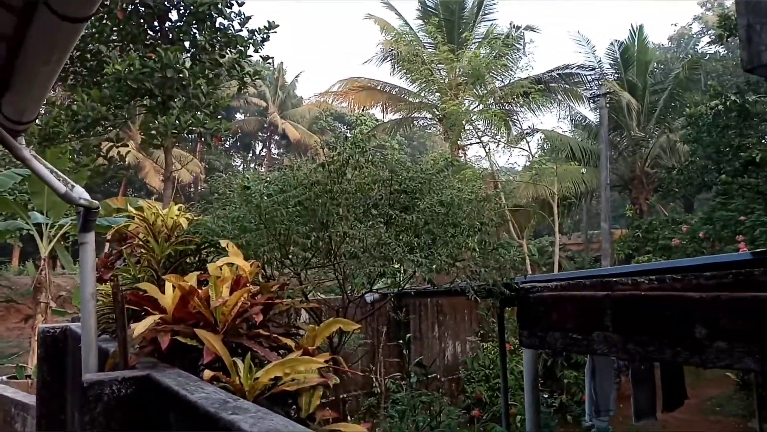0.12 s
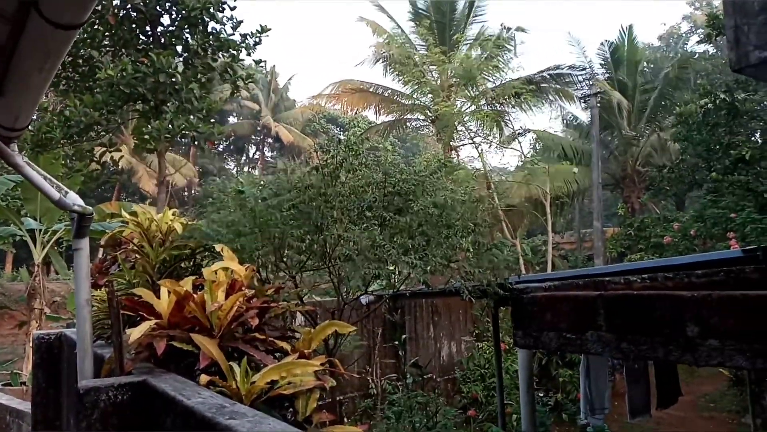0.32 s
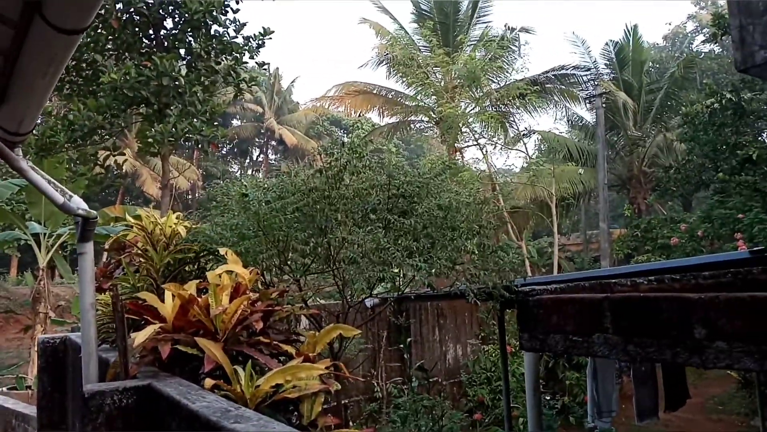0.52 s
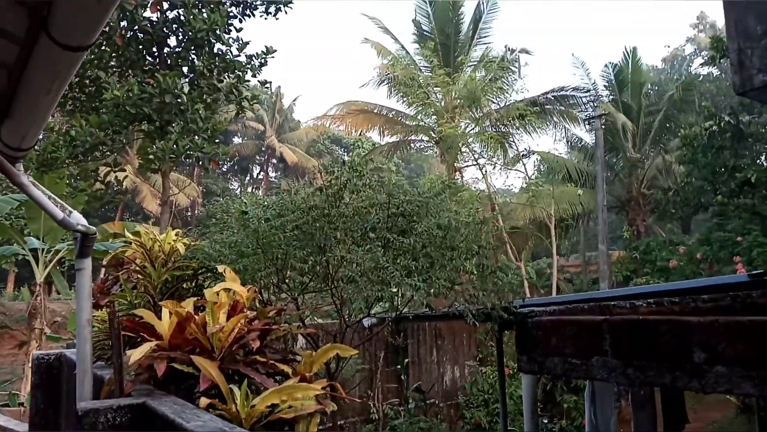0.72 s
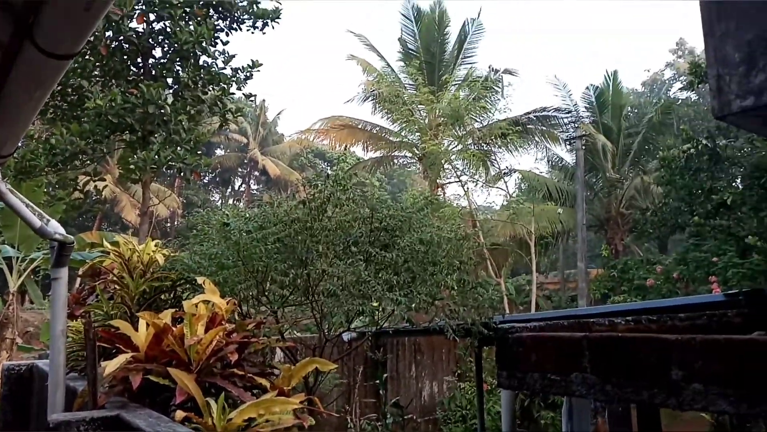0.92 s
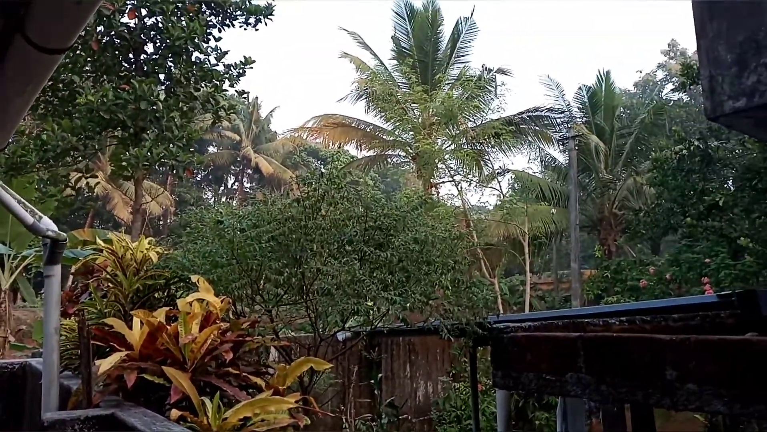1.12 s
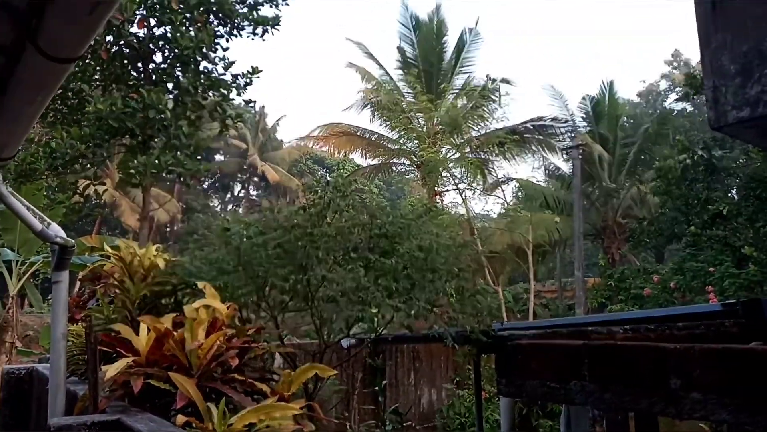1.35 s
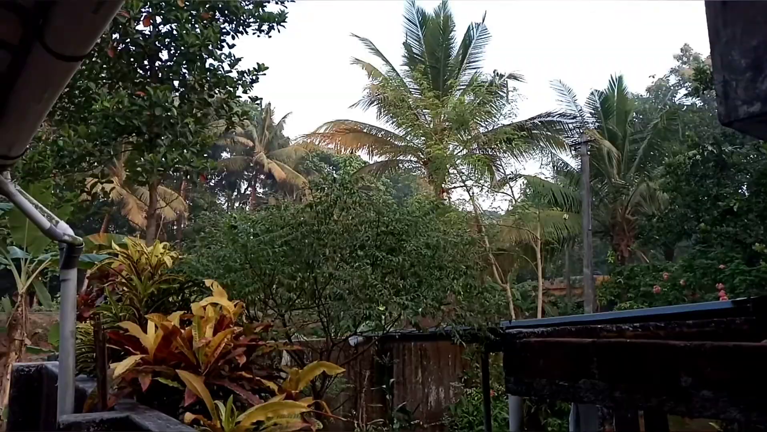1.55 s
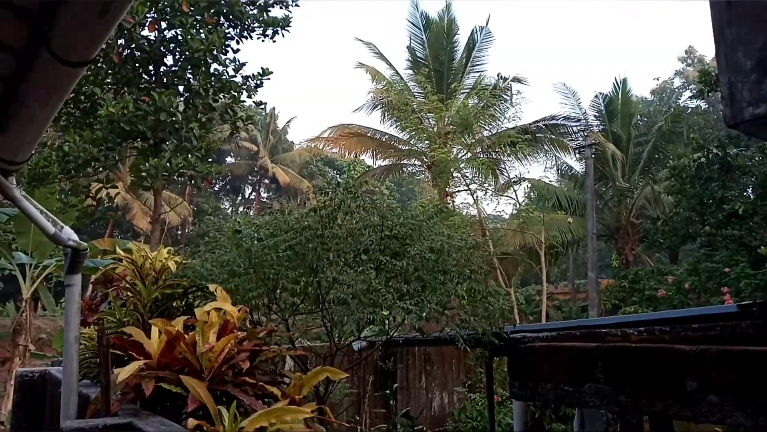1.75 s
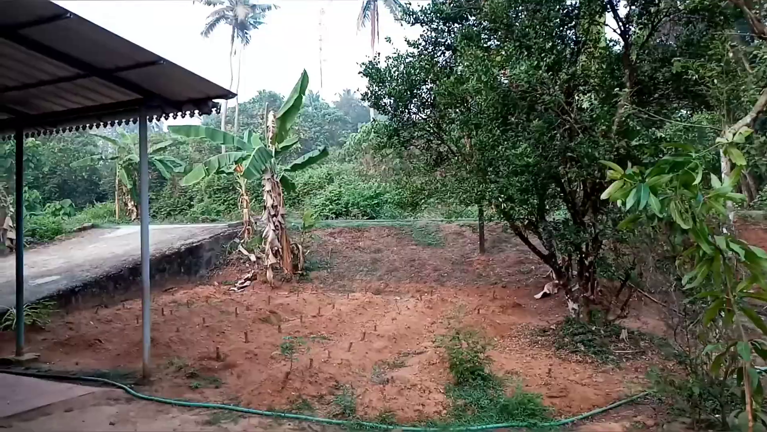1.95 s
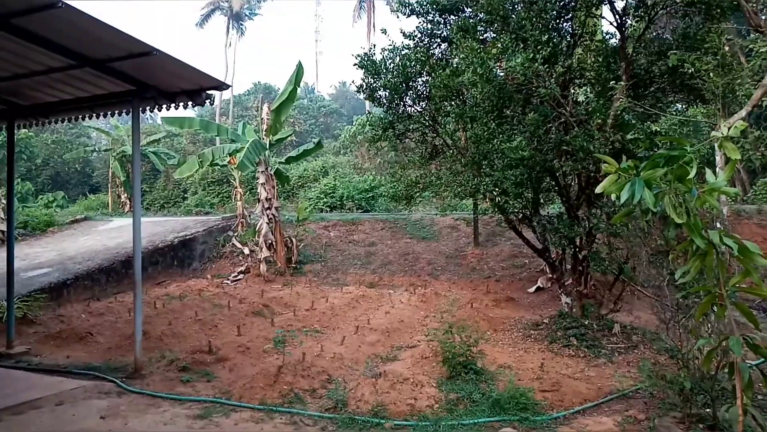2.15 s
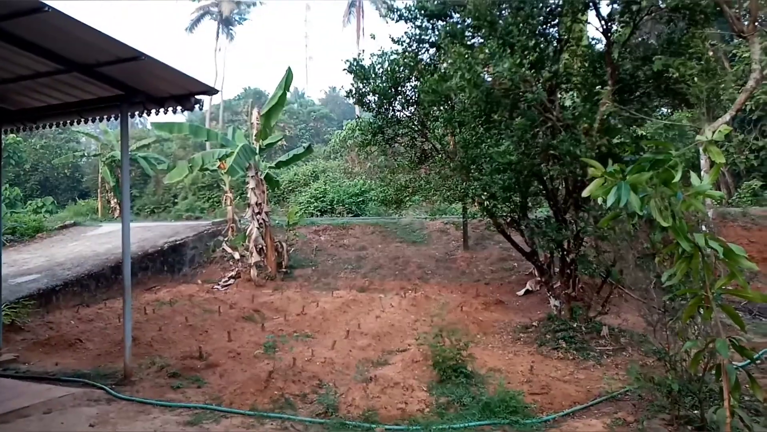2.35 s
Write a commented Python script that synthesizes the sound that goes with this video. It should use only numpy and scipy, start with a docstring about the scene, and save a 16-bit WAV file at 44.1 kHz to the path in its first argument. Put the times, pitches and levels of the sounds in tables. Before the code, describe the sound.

Birdsong echoes through a quiet garden: short fluty whistles from the start, a long arching slur at 0.5 s, buzzy chirps around 0.85 and 1.1 s, thin chips and far whistles between. Insects whine faintly high up. Close by, a dry rasp at 0.3 s and hollow knocks at 0.65, 1.7, 1.8 and 2.44 s. At 1.9 s insects drop abruptly, low rumble rises; a far crow caws at 2.05 s.

```python
"""Dawn in a tropical garden

A songbird's fluty phrase, thin chips, buzzy chirps and a far caw echo among trees. Birds are bending tones.
Insects are narrow bands of noise and one pulsing tone; open air is noise with more bass than treble.
Close by, shaped noise makes a short dry rasp, ticks and soft bumps, and dying tones make a few knocks.
Near the end the background changes at once: fewer insects, more low rumble, and blurred echoes of song."""
import sys
import numpy as np
from scipy import signal
from scipy.fft import rfft, irfft
from scipy.io import wavfile

SR = 44100
rng = np.random.default_rng(int(sys.argv[2]) if len(sys.argv) > 2 else 0)


def unload_audio(sound):
    """Save the sound as a 16-bit wav file, at the path given as the first command line argument."""
    columns = np.transpose(np.atleast_2d(sound))
    # keep every value between -1 and 1, then stretch to whole-number steps
    steps = np.round(np.clip(columns, -1, 1) * 32767)
    wavfile.write(sys.argv[1], SR, steps.astype(np.int16))


N = 108045
T = np.arange(N) / SR  # the time of every sample, in s
HZ = np.maximum(np.arange(N // 2 + 1) * SR / N, 1)  # the frequencies in a spectrum
CHANGE_S = 1.918  # the background changes here
TREES_T60_S, TREBLE_T60_S = 1.09, 0.63  # time for echoes to fall by 60 dB; high voices die sooner


def from_db(db):
    """Turn decibels into a gain."""
    return 10 ** (np.asarray(db) / 20)


def rms_one(x):
    """Scale a sound to a mean power of 1."""
    return x / np.sqrt(np.mean(x ** 2) + 1e-20)


def drift(rate_hz):
    """Random wandering with spread 1; changes faster than rate_hz are weakened."""
    spectrum = rfft(rng.standard_normal(N))
    return rms_one(irfft(spectrum / (1 + (HZ / rate_hz) ** 2), N))


def coloured(x, points):
    """Reshape the spectrum of x along (f/Hz, level/dB) points, at power 1."""
    hz, db = np.transpose(points)
    gain = from_db(np.interp(np.log(HZ), np.log(hz), db))
    return rms_one(irfft(rfft(x) * gain, N))


def band(hz, width_hz):
    """Noise in one bell-shaped band; the width is the standard deviation of its power."""
    bell = np.exp(-((HZ - hz) / (2 * width_hz)) ** 2)
    return rms_one(irfft(rfft(rng.standard_normal(N)) * bell, N))


def level(s, db):
    """Gain along a level curve, silent outside it."""
    return from_db(np.interp(T, s, db)) * (T > s[0]) * (T < s[-1])


def swell(start, length, edge=0.23):
    """Progress 0-1 through a note, and its rounded rise, hold and fall."""
    progress = np.clip((T - start) / length, 0, 1)
    nearest_end = np.minimum(progress, 1 - progress)
    return progress, np.sin(np.pi / 2 * np.clip(nearest_end / edge, 0, 1)) ** 2


def tone(hz):
    """A sine of power 1 that follows a pitch."""
    return np.sqrt(2) * np.sin(2 * np.pi * np.cumsum(hz * np.ones(N)) / SR)


def echo(x, echo_db, t60, build_up_s=0.004):
    """Add dense, dying scatter, as from trunks, leaves and walls."""
    tail = rng.standard_normal(N) * from_db(-60 * T / t60)
    tail = tail * (1 - np.exp(-(T / build_up_s) ** 2))
    tail = tail / np.sqrt(np.sum(tail ** 2))
    return x + from_db(echo_db) * signal.fftconvolve(x, tail)[:N]


def whistles(rows, waver):
    """Near-pure notes, each bending along a smooth curve through three pitches."""
    out, unsteady = 0, 1 + waver * drift(82)
    for start, length, first_hz, mid_hz, last_hz, db in rows:
        progress, shape = swell(start, length)
        bend = np.polyfit([0, .5, 1], [first_hz, mid_hz, last_hz], 2)
        hz = np.polyval(bend, progress)
        out = out + from_db(db) * shape * tone(hz * unsteady)
    return out


def scuffs(rows, width):
    """Brief puffs of noise, each around its own pitch; width is a fraction of that pitch."""
    out = 0
    for start, length, hz, db in rows:
        out = out + from_db(db) * swell(start, length)[1] * band(hz, width * hz)
    return out


def open_air(early_db=-67.5, late_db=-64.5):
    """The hush and rumble of open air: noise shaped one way before the change, another after."""
    # spectrum before the change: f/Hz, level/dB (relative)
    early_colour = [(25, -38), (60, -3), (110, 3), (150, 1.5), (185, 11.5), (230, -1.5), (320, 1),
                    (500, -9.5), (1200, -10.5), (3000, -12), (5500, -35), (9500, -15.5), (10500, -37),
                    (14000, -36.5), (15000, -23), (16000, -26.5)]
    # spectrum after the change: f/Hz, level/dB (relative)
    late_colour = [(25, -12), (60, 6.5), (110, 4), (200, -3.5), (400, -19.5), (700, -18.5), (2200, -21),
                   (3500, -30), (9500, -36), (10500, -39.5), (14000, -44), (15000, -28.5), (16000, -36)]
    early = from_db(early_db) * coloured(rng.standard_normal(N), early_colour)
    late = from_db(late_db) * coloured(rng.standard_normal(N), late_colour)
    return np.where(T > CHANGE_S, late, early)


def insects(flicker_db=2.5, flicker_hz=20):
    """A high whine: noise bands that each flicker in strength."""
    # insect bands: f/Hz, width/Hz, level before the change/dB, level after/dB
    insect_bands = [(3300, 780, -88, -87), (5580, 550, -85.5, -95), (6175, 66, -67.5, -74),
                    (6510, 91, -67, -74.5), (7270, 330, -78.5, -81), (8100, 170, -79.5, -84.5),
                    (9025, 230, -65, -70.5)]
    out = 0
    for hz, width_hz, before_db, after_db in insect_bands:
        db = np.where(T > CHANGE_S, after_db, before_db) + flicker_db * drift(flicker_hz)
        out = out + from_db(db) * band(hz, width_hz)
    return out


def swelling_insects(width_hz=190):
    """A distant chorus: a hiss that swells, wanders in pitch and later drops in level."""
    # path of the band: t/s, f/Hz, level/dB
    path = [(0, 4570, -74.5), (0.499, 4520, -71.5), (1.249, 4680, -69.5), (1.549, 4765, -71),
            (1.89, 4710, -71), (1.951, 4660, -81), (2.45, 4720, -80)]
    s, hz, db = np.transpose(path)
    # turning the complex (analytic) noise slides the whole band up or down
    shift = np.exp(2j * np.pi * np.cumsum(np.interp(T, s, hz) - hz[0]) / SR)
    hiss = np.real(signal.hilbert(band(hz[0], width_hz)) * shift)
    return from_db(np.interp(T, s, db)) * hiss


def cricket(top_hz=8006, sag_hz=274, period_s=0.09, db=-69, rough=0.012):
    """Evenly repeated wing strokes, each sagging in pitch, heard until the change."""
    stroke = (T / period_s) % 1  # progress through each stroke
    hz = (top_hz - sag_hz * stroke) * (1 + rough * drift(500))
    strength = np.sin(np.pi * stroke) * (1 + 0.61 * drift(180))
    return from_db(db) * strength * tone(hz) * (T < CHANGE_S)


def late_echoes():
    """Blurred remains of song: noise bands that start at the change and die away."""
    # blurred echoes: f/Hz, width/Hz, level at the change/dB, time to fall by 60 dB/s
    echo_bands = [(2245, 95, -59.5, 1.0), (1750, 220, -64.5, .6), (3540, 64, -63.5, 0.49),
                  (2980, 67, -68, 0.46)]
    age = np.maximum(T - CHANGE_S, 0)
    out = 0
    for hz, width_hz, db, t60 in echo_bands:
        out = out + from_db(db - 60 * age / t60) * band(hz, width_hz)
    return (T > CHANGE_S) * out


def caw(jitter=.011, flutter=0.53, hoarse_db=-6.5):
    """A far crow: a hoarse stack of partials (multiples of one pitch), strongest third and fourth."""
    # path of the caw: t/s, f/Hz, level/dB
    path = [(2.02, 503.7, -63), (2.055, 534.3, -46.5), (2.099, 539.6, -46), (2.126, 535, -46),
            (2.152, 529.4, -46), (2.182, 516.7, -52), (2.198, 526, -49)]
    # partials from the first up: level/dB (relative)
    partials_db = [-59, -17, -3, 2, -40]
    s, hz, db = np.transpose(path)
    pitch = np.interp(T, s, hz) * (1 + jitter * drift(250))
    voice = 0
    for multiple, partial_db in enumerate(partials_db, 1):
        voice = voice + from_db(partial_db) * tone(multiple * pitch) * (1 + flutter * drift(100))
    hoarse = from_db(hoarse_db) * band(2020, 147)
    return level(s, db) * rms_one(rms_one(voice) + hoarse)


def far_whistles():
    """Unsteady whistles from far off, before their strong echo is added."""
    # far notes: start/s, length/s, first f/Hz, middle f/Hz, last f/Hz, level/dB
    far_notes = [(-.02, 0.069, 1950, 1840, 1800, -72), (.56, 0.081, 2930, 3118, 3050, -68),
                 (.76, 0.088, 3320, 3550, 3360, -78), (.84, 0.081, 2640, 2710, 2740, -62.5),
                 (.885, 0.11, 2720, 2852, 2730, -66.5), (.95, 0.11, 1790, 1860, 1900, -68),
                 (1.17, 0.16, 2500, 2320, 2200, -71), (1.26, 0.066, 3000, 3200, 3300, -76),
                 (1.45, 0.059, 3470, 3510, 3480, -73), (1.43, 0.032, 6800, 7030, 7120, -67),
                 (1.655, .03, 3500, 3080, 2680, -71.5), (1.885, 0.035, 5600, 5650, 5500, -79),
                 (2.055, 0.089, 4050, 4000, 3920, -71), (2.16, .17, 2500, 2564, 2750, -77.5)]
    return whistles(far_notes, waver=0.0143)


def chips(length_s=0.025, fall=0.096, octave_db=2.5, waver=0.035):
    """Quick, rough chips that fall in pitch, with a strong octave above."""
    # chips: start/s, starting f/Hz, level of the lower tone/dB
    chip_rows = [(0.189, 3700, -64.5), (0.735, 3624, -65), (1.032, 3880, -66), (1.646, 3754, -66)]
    out, unsteady = 0, 1 + waver * drift(337)
    for start, hz, db in chip_rows:
        progress, shape = swell(start, length_s)
        pitch = hz * (1 - fall * progress ** 2) * unsteady
        voice = tone(pitch) + from_db(octave_db) * tone(2 * pitch)
        out = out + from_db(db) * shape * voice
    return out


def buzzes(buzz_hz=182.3, rough=0.28, flutter=0.66, edge=.38):
    """Chirps whose pitch and strength shake quickly and unevenly."""
    # chirps: start/s, length/s, f/Hz, scale of the pitch shake/Hz, level before flutter/dB
    chirps = [(.706, .072, 5450, 520, -64), (.848, .102, 4500, 480, -55.5), (1.068, .102, 4480, 520, -55.5),
              (1.056, .075, 5550, 400, -66.5)]
    out = 0
    for start, length, hz, sweep_hz, db in chirps:
        buzz = tone(buzz_hz * (1 + .25 * drift(60.3)))  # buzz_hz is the average rate
        shake = 0.344 * buzz + rough * drift(500)
        strength = swell(start, length, edge)[1] * (1 + flutter * drift(280))
        out = out + from_db(db) * strength * tone(hz + sweep_hz * shake)
    return out


def bumps():
    """Soft dull bumps near the microphone: puffs of low noise."""
    # bumps: start/s, length/s, f/Hz, level/dB
    bump_rows = [(.49, 0.033, 86.4, -61), (.66, 0.15, 98, -68.5), (1.72, 0.095, 330, -68),
                 (1.87, 0.087, 287, -61.5), (1.95, 0.037, 308, -73), (1.905, 0.13, 72.4, -61),
                 (2.26, 0.044, 93.5, -66)]
    return scuffs(bump_rows, width=0.26)


def ticks():
    """Short puffs of noise in narrower bands: a high burst that ends the rasp, then light ticks."""
    # puffs (the first ends the rasp, the rest are ticks): start/s, length/s, f/Hz, level/dB
    tick_rows = [(.354, 0.019, 5740, -48.5), (.494, .012, 2860, -59), (0.496, 0.024, 1340, -61.5),
                 (2.182, 0.0076, 4700, -56)]
    return scuffs(tick_rows, width=0.1)


def knocks(low_hz=80, top_hz=2100):
    """Taps on a small hollow body near the microphone: ringing tones, in varied brightness."""
    # taps: t/s, level/dB, extra level of the upper tones/dB, contact time that softens the start/s
    taps = [(0.6564, -36.5, -9, 0.0019), (1.7144, -34, 4, 0.0003), (1.813, -41, -19, 0.0046),
            (2.441, -42.5, -22, 0.0039)]
    # ringing tones of the body: f/Hz, level/dB (relative), time to fall by 60 dB/s
    modes = [(205, -1.5, 0.016), (344, 2, 0.029), (1220, -0.5, .007), (1444, -5, 0.0082)]
    out = 0
    for s, db, bright_db, contact_s in taps:
        age = np.maximum(T - s, 0)
        rise = 1 - np.exp(-age / contact_s)
        for hz, mode_db, t60 in modes:
            upper = hz > 2 * modes[1][0]
            ring_db = db + mode_db + bright_db * upper - 60 * age / t60
            out = out - rise * from_db(ring_db) * np.sin(2 * np.pi * hz * age)
    limits = signal.butter(2, [low_hz, top_hz], "band", fs=SR, output="sos")
    return signal.sosfilt(limits, out)


def rasp(grains_per_s=1800, grain_db=-5, flutter_db=1, flutter_hz=180):
    """A close, dry, uneven rasp: dense tiny catches over a hiss."""
    # path of the rasp: t/s, level/dB
    path = [(0.244, -62), (.252, -53), (0.259, -45), (0.277, -36.5), (0.309, -35.5), (.335, -36.5),
            (0.349, -40.5), (0.373, -44.5), (0.383, -70)]
    # its spectrum: f/Hz, level/dB (relative)
    colour = [(100, -26.5), (400, -15), (900, -12), (1500, -2), (2900, -0.5), (4000, -6.5), (4700, -14),
              (6300, -10.5), (8200, -27.5), (9300, -34), (10000, -42.5), (14000, -51), (15300, -26),
              (16000, -45)]
    grains = (rng.random(N) < grains_per_s / SR) * rng.standard_normal(N)
    friction = rng.standard_normal(N) + from_db(grain_db) * rms_one(grains)
    friction = friction * from_db(flutter_db * drift(flutter_hz))
    return level(*np.transpose(path)) * coloured(friction, colour)


def slur(waver=0.0068, tremble=0.52, tremble_hz=85):
    """The main long arching whistle, whose strength trembles more and more toward its end."""
    # path of the whistle: t/s, f/Hz, level before the tremble/dB
    path = [(0.453, 1980, -58), (.478, 2060, -55), (0.501, 2170, -61.5), (0.528, 2240, -45),
            (0.561, 2239, -55), (.6, 2089, -45), (0.623, 2036, -50), (0.643, 1796, -50.5),
            (0.676, 1440, -65), (.69, 1380, -86)]
    s, hz, db = np.transpose(path)
    progress, _ = swell(s[0], s[-1] - s[0])
    strength = level(s, db) * (1 + tremble * progress * tone(tremble_hz))
    return strength * tone(np.interp(T, s, hz) * (1 + waver * drift(49)))


def song():
    """The songbird's phrase: short bending whistles around one long slur."""
    # short notes: start/s, length/s, first f/Hz, middle f/Hz, last f/Hz, level/dB
    notes = [(-.05, 0.089, 1520, 1559, 1445, -56.5), (.04, 0.081, 1526, 1488, 1540, -63.5),
             (.155, 0.049, 1990, 1952, 1830, -55.5), (.183, 0.032, 1773, 1718, 1860, -51),
             (.225, 0.081, 1860, 1915, 1876, -50.5), (.27, 0.053, 2450, 2201, 1720, -50.5),
             (.335, 0.069, 1750, 1534, 1500, -54.5), (.7425, 0.014, 1570, 1546, 1590, -44.5),
             (.783, 0.048, 1535, 1509, 1640, -55.5), (.815, .04, 1510, 1477, 1510, -73),
             (1.852, 0.067, 2020, 2013, 1967, -56), (1.882, 0.029, 1950, 1874, 1771, -54)]
    return whistles(notes, waver=0.0061) + slur()


def scene():
    """Birds among the trees, insects behind them, dry sounds close by, the same in both channels."""
    background = open_air() + insects() + swelling_insects() + cricket() + late_echoes()
    birds = echo(caw(), -9, TREES_T60_S)
    birds = birds + echo(far_whistles(), 4, TREBLE_T60_S)
    birds = birds + echo(chips(), 4, TREBLE_T60_S)
    birds = birds + echo(buzzes(), -5.5, TREBLE_T60_S)
    birds = birds + echo(song(), -1, TREES_T60_S)
    # the knocks have a short echo from nearby walls
    close = bumps() + ticks() + echo(knocks(), -14.5, 0.41) + rasp()
    return np.tile(background + birds + close, (2, 1))


def record(dry, cutoff_hz=15800):
    """Cut the very highest treble steeply."""
    return signal.sosfilt(signal.ellip(12, .1, 80, cutoff_hz, fs=SR, output="sos"), dry)


dry = scene()
out = record(dry)
unload_audio(out)
```